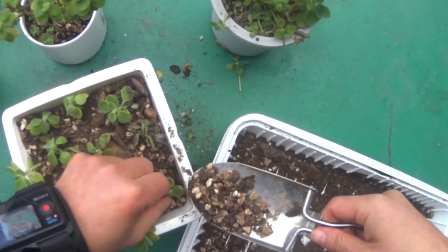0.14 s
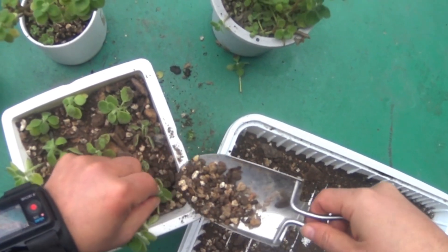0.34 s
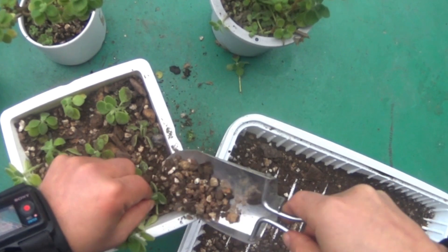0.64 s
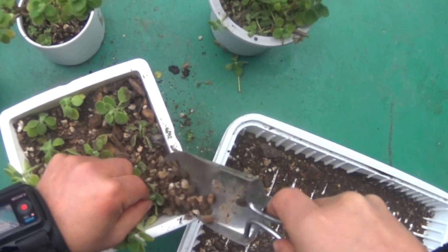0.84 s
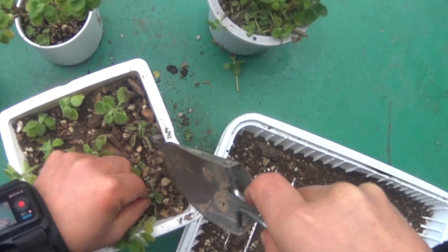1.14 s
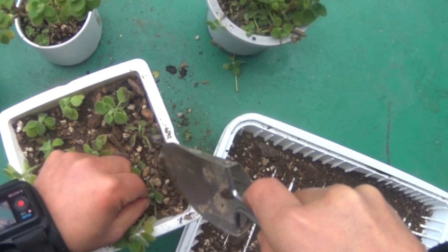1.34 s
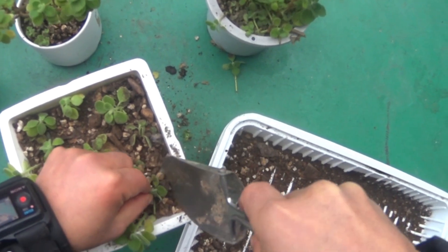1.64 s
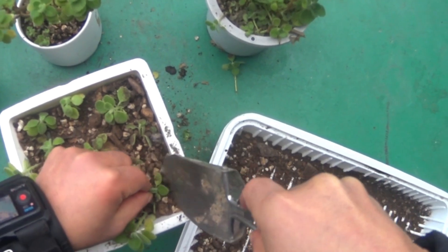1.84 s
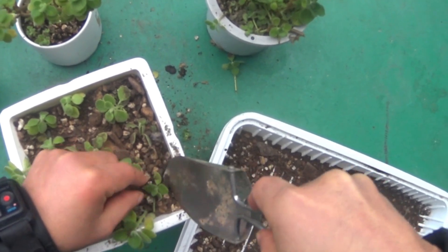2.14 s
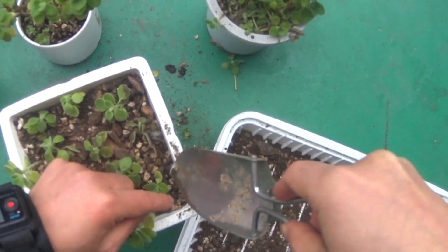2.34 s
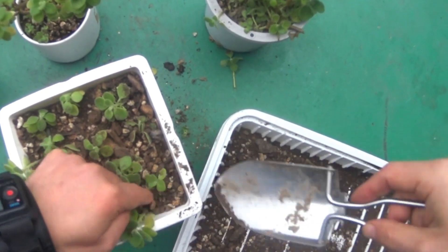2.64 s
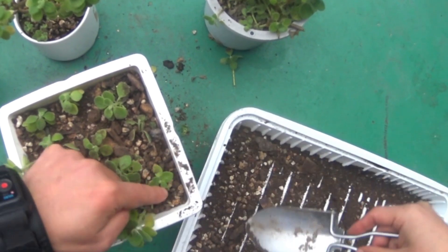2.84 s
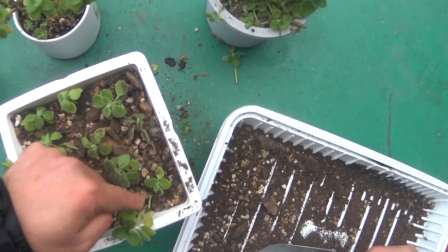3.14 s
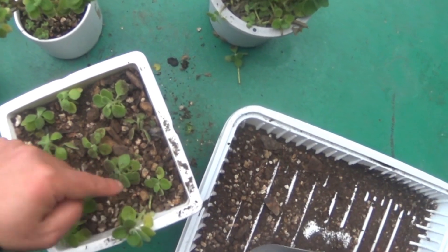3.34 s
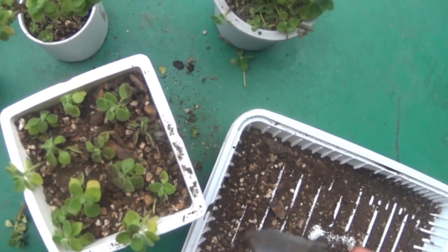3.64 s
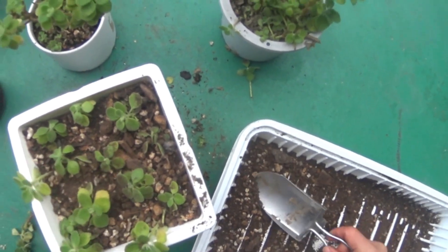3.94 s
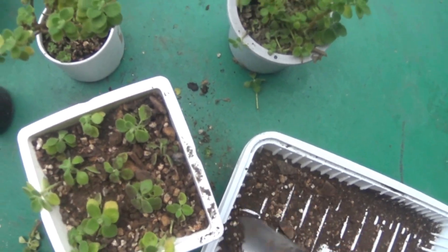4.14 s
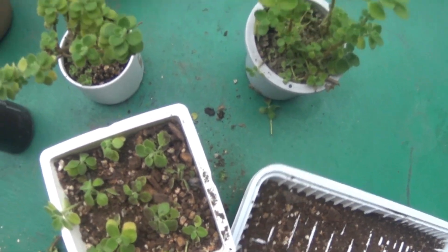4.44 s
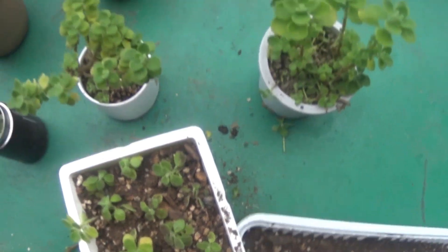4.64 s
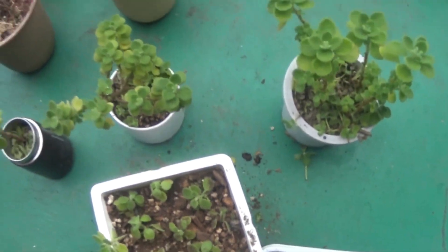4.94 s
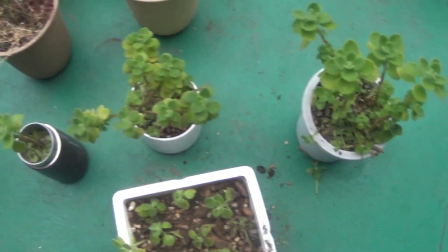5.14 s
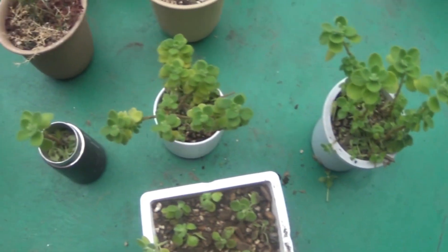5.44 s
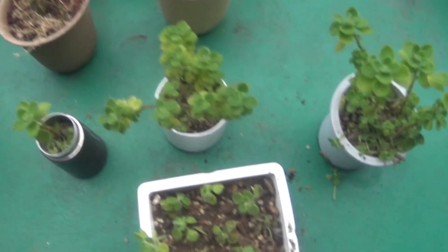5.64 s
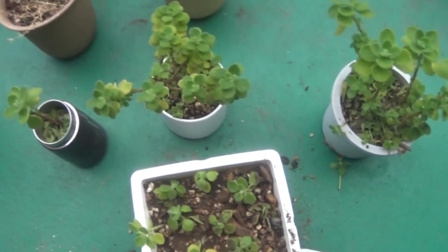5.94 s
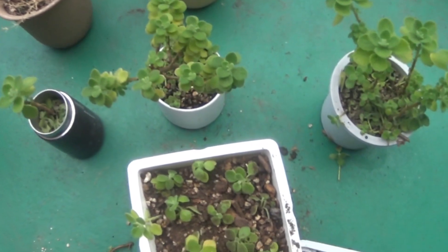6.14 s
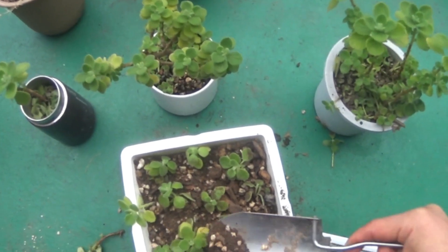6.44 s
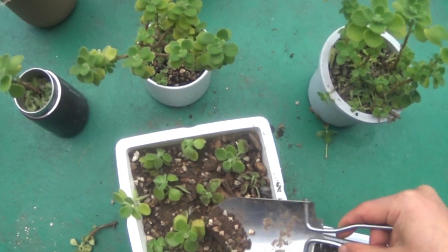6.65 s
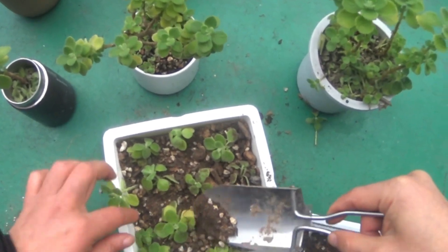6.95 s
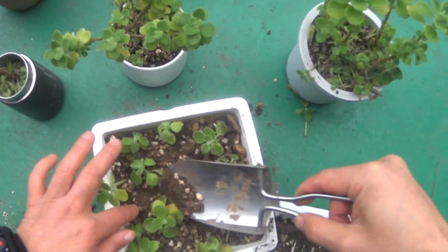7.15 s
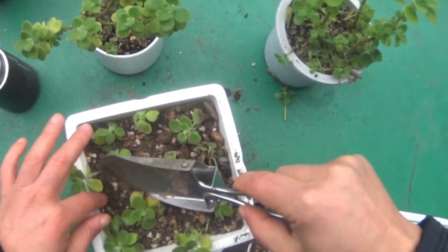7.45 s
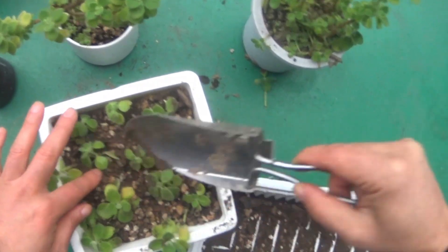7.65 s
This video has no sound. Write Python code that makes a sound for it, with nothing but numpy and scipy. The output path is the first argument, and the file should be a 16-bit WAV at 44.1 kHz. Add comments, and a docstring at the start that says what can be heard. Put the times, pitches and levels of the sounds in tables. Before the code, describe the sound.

A close stereo microphone pair hears soil trickling from a metal hand trowel, then quick rasping pats with ringing clinks. After a soft sleeve rustle, the trowel digs into grit in a thin plastic tray, with hard snapping stones, juddering edges and hollow rattle. Dull foot scuffs and brushing cloth follow, then isolated light metallic tings. The space is small and dry, with a faint steady background hiss.

```python
"""Over a faint steady background, gritty soil slides and ticks off a ringing steel trowel, then is patted down.
A sleeve rustles, the blade digs through a thin plastic tray, stones snap, feet scuff and last grains ting.
Soil, stones, soles and cloth are random collisions or noise bursts coloured by the spectrum of the body;
steel and plastic add tuned resonances. Short reflections and a wide stereo side signal place it up close."""
import sys
import numpy as np
from scipy import signal
from scipy.fft import rfft, irfft, next_fast_len
from scipy.io import wavfile
from scipy.ndimage import uniform_filter1d

SR = 44100
rng = np.random.default_rng(int(sys.argv[2]) if len(sys.argv) > 2 else 0)


def wav_record(signal):
    """Record a signal, one row per channel, as 16-bit PCM in the file named by sys.argv[1]."""
    frames = np.transpose(np.atleast_2d(signal))
    bounded = np.clip(frames, -1, 1)
    # unit amplitude maps onto the largest positive 16-bit level
    quanta = np.round(bounded * 32767).astype(np.int16)
    wavfile.write(sys.argv[1], SR, quanta)


N = 344421
T = np.arange(N) / SR
SIZE = next_fast_len(N + 8192, real=True)   # padded transform length
HZ = np.maximum(np.arange(SIZE // 2 + 1) * SR / SIZE, 1)

# Levels in the tables are before the trims and colouring in the functions.
# soil flow off the tilted blade, steepest just before it empties: time_s, level_db
POUR = [(0.45, -87), (0.61, -69), (0.8, -67), (0.91, -61), (0.99, -69.5), (1.35, -86)]
# short pushes of the blade into the soil: middle_s, level_db, half_length_s
PUSHES = [(1.533, -44, 0.015), (1.586, -52.5, 0.023), (1.701, -56, 0.017), (1.815, -60, 0.023),
          (1.905, -51.5, 0.034), (1.944, -60, 0.014), (2.02, -52, 0.02), (2.102, -63, 0.024),
          (2.163, -51.5, 0.021), (2.207, -58.5, 0.011)]
# grit and rim striking the blade: start_s, peak_db, ring_hz, fizz_db
BLADE_HITS = [(0.5755, -38, 2080, -54.5), (0.7142, -39, 5840, -57), (0.7665, -44, 4800, -60),
              (0.9269, -40, 4750, -59), (0.955, -39.5, 4830, -47), (1.0212, -38.5, 4880, -51.5),
              (1.0656, -35, 4920, -53), (1.0999, -41, 4650, -64), (1.1414, -45.5, 4200, -69),
              (1.3585, -48.5, 4080, -76), (1.51, -31.5, 4780, -47.5), (1.5426, -25.5, 5260, -37.5),
              (1.6317, -42, 5700, -55.5), (1.7622, -20, 5800, -46), (1.861, -39.5, 5400, -57),
              (1.9068, -33, 4250, -48), (6.4306, -53, 2630, -70), (6.4883, -41, 6220, -53.5)]
# strokes of the blade through the tray: start_s, length_s, grit_db, tray_body_db
DIG_STROKES = [(3.42, 0.072, -58.5, -57.5), (3.62, 0.24, -70.5, -69.5), (3.96, 0.09, -49.5, -49.5),
               (4.1, 0.35, -45.5, -48), (4.54, 0.19, -49.5, -48.5), (4.82, 0.17, -59.5, -55.5)]
# larger stones snapping against the tray: start_s, peak_db, ring_hz, knock_db
STONE_SNAPS = [(3.383, -26.5, 1290, -58), (3.441, -36.5, 2350, -44), (3.482, -23.5, 2610, -40),
               (3.4904, -27, 2530, -39), (3.513, -30, 3320, -65), (3.525, -24.5, 2880, -38),
               (3.531, -28, 3080, -38.5), (3.562, -28.5, 3050, -59), (3.576, -39.5, 1320, -45.5),
               (3.792, -41.5, 2240, -64), (3.9021, -29.5, 5070, -69), (3.911, -27, 4850, -48.5),
               (3.9243, -31.5, 6300, -53), (3.9542, -29, 2030, -67), (4.0664, -25.5, 1720, -81),
               (4.0876, -19.5, 2600, -57), (4.128, -23, 3470, -43), (4.154, -21, 5900, -41),
               (4.1888, -23, 5600, -82), (4.2116, -26.5, 2220, -44), (4.221, -26, 5940, -39),
               (4.2643, -15.5, 4700, -33.5), (4.3207, -18, 4600, -41), (4.357, -17, 5300, -42),
               (4.3662, -16, 5050, -55), (4.3846, -26.5, 5200, -40), (4.4038, -21.5, 6400, -33),
               (4.4114, -20.5, 2010, -37), (4.4363, -38, 4950, -37), (4.4972, -31, 2460, -42),
               (4.5309, -19, 1290, -27.5), (4.551, -27.5, 2500, -48), (4.607, -24, 2620, -40),
               (4.6535, -21, 2490, -28.5), (4.68, -23, 2360, -30), (4.691, -30, 1350, -26),
               (4.7129, -23.5, 2920, -36), (4.7195, -20, 4600, -32), (4.7396, -20, 4450, -36),
               (4.7504, -21.5, 2580, -34.5), (4.7716, -27.5, 1290, -46), (4.7932, -29, 3800, -64)]
# crumbs falling back as the loaded blade is lifted: start_s, peak_db
CRUMBS = [(4.7996, -40), (4.8304, -45.5), (4.853, -53), (4.872, -48)]
# blade edge juddering over the tray floor: middle_s, level_db, half_length_s
JUDDERS = [(3.53, -52, 0.033), (3.976, -32, 0.017), (4.015, -38.5, 0.017), (4.215, -32.5, 0.0049),
           (4.258, -39, 0.0065), (4.33, -38, 0.034), (4.397, -39, 0.018), (4.73, -38, 0.011)]
# slips of the tray on the floor: middle_s, level_db, half_length_s
TRAY_SLIPS = [(4.425, -64, 0.035), (4.654, -62, 0.0041), (4.715, -68, 0.063)]
# light clean tings of the free, nearly empty blade: start_s, level_db, lead_mode_hz
TINGS = [(3.636, -62.5, 4883), (6.523, -64, 4883), (6.879, -59, 3335), (7.112, -56.5, 4883),
         (7.412, -53, 4883)]
# scuffs on the floor: start_s, length_s, level_db
SCUFFS = [(5.06, 0.04, -54.5), (5.12, 0.049, -51), (5.3, 0.099, -51.5), (5.52, 0.3, -63.5),
          (7.73, 0.037, -69.5)]
# movements of the sleeve: start_s, length_s, swish_db, rub_db
SLEEVE_MOVES = [(2.22, 0.18, -70, -69.5), (2.7, 0.33, -62.5, -69.5), (4.98, 0.49, -59.5, -69.5),
                (5.65, 0.092, -62, -59.5), (5.9, 0.56, -67, -65.5), (6.76, 0.037, -62.5, -72),
                (7.12, 0.33, -69, -68), (7.78, 0.03, -64, -68.5)]
# modes of the steel blade: pitch_hz, relative_level_db, t60_s
BLADE_MODES = [(2376, -6, 0.19), (3335, 2.5, 0.18), (4883, 6.5, 0.058), (5350, -9, 0.076),
               (6000, -12, 0.014), (7320, -9, 0.019), (9100, -9, 0.027)]
# colour of soil on steel: frequency_hz, relative_level_db_per_hz
SOIL_ON_STEEL = [(650, -50), (1100, -37), (1290, -4.5), (1580, -5), (2340, 2.5), (2820, -7), (3240, -0.5),
                 (3900, -2.5), (4940, 1.5), (6130, 0.5), (6640, -3), (8570, -9), (9830, 1), (11200, -12),
                 (11500, -60), (15000, -65), (22000, -120)]
# colour of the thin plastic tray: frequency_hz, relative_level_db_per_hz
TRAY_COLOUR = [(88, -65), (150, -9), (263, -4.5), (973, -14), (1110, -15.5), (1300, -1.5), (1560, -12),
               (1710, -12.5), (2410, -3), (3470, -6), (5870, -4), (8450, -22.5), (9420, -12.5),
               (10900, -22.5), (11500, -28), (15000, -103), (22000, -120)]
# colour of a sole on the floor: frequency_hz, relative_level_db_per_hz
SOLE_COLOUR = [(88, -61), (150, -21), (203, -26), (409, -22), (516, -15.5), (609, -3.5), (1030, -4),
               (1240, 0.5), (1850, -8.5), (2160, -6), (2410, -8), (2650, -40), (4000, -19.5), (5200, -26),
               (8800, -120)]
# colour of rubbing cloth: frequency_hz, relative_level_db_per_hz
CLOTH_COLOUR = [(410, -39), (700, -6.5), (787, -7.5), (949, -20), (1270, 1.5), (1920, -3.5), (2630, 0),
                (3820, -7.5), (5830, -7.5), (7370, -19), (9530, -17), (11100, -23), (11500, -85),
                (15000, -68), (22000, -120)]
# colour of the background: frequency_hz, relative_level_db_per_hz
AIR_COLOUR = [(12, -29), (20, -4.5), (151, -7), (250, -8), (309, -9.5), (383, -9.5), (669, -11.5),
              (1200, -7.5), (1330, 1), (1650, -9.5), (2210, -7.5), (2740, -10), (4080, -14.5),
              (10600, -21.5), (11500, -32), (15000, -66), (22000, -120)]
# stereo widening by the microphone: frequency_hz, side_to_mid_db, side_lag_rad
WIDENING = [(60, -23, 2.1), (237, -2, 1.55), (536, 6.5, 1.73), (936, 5, 2.27), (1290, 3, 3.8),
            (1580, -12.5, 2.76), (2340, -73, 1), (4500, -31, 3), (9900, -12, 1.6)]
# weighting of the surrounding sound in the side channel: frequency_hz, gain_db
DIFFUSE = [(30, -22), (150, -14.5), (500, -16.5), (1300, -9), (2500, -10), (11000, -11.5)]

AIR_DB, CUTOFF_HZ = -69.5, 11250
# crumbs trickling round each push: level against the push, half length in s
TRICKLE_DB, TRICKLE_S = -31, 0.029
BLADE_KNOCK_DB = -18   # hollow knock against the blade hit's table peak, before trims
CRUNCH_RISE_S = 0.0006   # time constant as a grain gives way
# a dig takes hold quickly; its grit stops before the tray does (s per 20 dB)
DIG_ATTACK_S, GRIT_RELEASE_S, RATTLE_RELEASE_S = 0.069, 0.034, 0.23
# a snap crushes fine grit: fizz against table peak, and share of the grit level in dB it follows
FIZZ_DB, FIZZ_FOLLOWS = -19.5, 0.22
# crumbs share one pitch; knock and fizz are against the table peak, before trims
CRUMB_RING_HZ, CRUMB_KNOCK_DB, CRUMB_FIZZ_DB = 4370, -15, -2
SHOVE_FOLLOW_DB = -23   # floor rumble against the tray body level
SCUFF_ATTACK_S, SCUFF_RELEASE_S = 0.11, 0.13   # s per 20 dB
SLEEVE_ATTACK_S, SLEEVE_RELEASE_S = 0.25, 0.3   # s per 20 dB


def from_db(db):
    """Decibels to gain."""
    return 10 ** (np.asarray(db) / 20)


def rms_one(x):
    """Scale to unit power."""
    return x / np.sqrt(np.mean(x ** 2) + 1e-20)


def top_one(x, size):
    """Scale so that the loudest stretch of this many samples has unit power."""
    return x / np.sqrt(uniform_filter1d(x ** 2, size=size).max())


def gain_curve(points):
    """Smoothed gain in time from (s, dB) points, silent outside them."""
    s, db = np.transpose(points)
    level_db = np.interp(T, s, db, left=-200, right=-200)
    return uniform_filter1d(from_db(level_db), size=400)


def swells(rows):
    """Gain in time of short bell-shaped strokes."""
    return sum(from_db(level_db) * np.exp(-((T - s) / half_s) ** 2) for s, level_db, half_s in rows)


def strokes(rows, attack_s, release_s, axis=2):
    """Gain in time of movements: each swells, holds its level for its length and dies away."""
    power = 0
    for row in rows:
        start, length = row[:2]
        before = np.maximum(start - T, 0)
        after = np.maximum(T - start - length, 0)
        fade_db = 20 * (before / attack_s + after / release_s)
        power = power + from_db(row[axis] - np.minimum(fade_db, 100)) ** 2
    return np.sqrt(power)


def at_hz(points, axis=1):
    """A table column along log frequency."""
    points = np.array(points)
    return np.interp(np.log(HZ), np.log(points[:, 0]), points[:, axis])


def response(spectrum):
    """Causal (minimum-phase) impulse response of a body with this spectrum."""
    cepstrum = irfft(np.log(from_db(at_hz(spectrum))), SIZE)
    # folding the cepstrum forward in time makes the response causal
    cepstrum[1:SIZE // 2] *= 2
    cepstrum[SIZE // 2 + 1:] = 0
    return irfft(np.exp(rfft(cepstrum)), SIZE)[:4096]


def through(x, impulse):
    """Pass a sound through an impulse response."""
    return signal.fftconvolve(x, impulse)[:len(x)]


def cut(x, hz, kind, order=2):
    """High- or low-pass."""
    sos = signal.butter(order, min(hz, .45 * SR), kind, fs=SR, output="sos")
    return signal.sosfilt(sos, x)


def resonance(x, hz, width_hz):
    """One resonance, gain 1 at its top."""
    r = np.exp(-np.pi * width_hz / SR)
    zeros = np.array([1, 0, -1]) * (1 - r * r) / 2
    poles = [1, -2 * r * np.cos(2 * np.pi * hz / SR), r * r]
    return signal.lfilter(zeros, poles, x + 1e-18)


def drift(rate):
    """Slow random wander between unit-spread points, rate points a second."""
    points = rng.standard_normal(8000)
    return np.interp(T * rate, np.arange(len(points)), points)


def grains(per_s, spread_db, clump_db, clump_rate):
    """Tiny collisions of uneven size, bunched as the grit sticks and slips."""
    born, luck = rng.random((2, N))
    at = np.flatnonzero(born < per_s / SR)
    own_db = spread_db * np.minimum(-np.log(luck[at]), 4)
    bunch_db = clump_db * np.clip(drift(clump_rate)[at], -2, 2)
    sign = 1 - 2 * rng.integers(0, 2, N)[at]
    clicks = np.zeros(N)
    clicks[at] = from_db(own_db + bunch_db) * sign
    return clicks


def stones(clicks, cycles):
    """Each grain rings briefly at one of sixteen pitches, dealt at random; cycles is the resonance Q."""
    pitches = np.geomspace(1000, 11000, num=16)
    dealt = rng.integers(0, len(pitches), N)
    return rms_one(sum(resonance(clicks * (dealt == k), hz, hz / cycles) for k, hz in enumerate(pitches)))


def hits(rows, spectrum, rise_s, decay_s, crumble_db, crumble_s, ring_db, ring_width_hz,
         crack_db, knock_db, knock_hz, knock_width_hz, fizz_db):
    """Each hit crunches and trails crumbs: a ringing crack, a hollow knock and a fizz of fine grit."""
    out, body, t = np.zeros(N + 4096), response(spectrum), T[:4096]
    decay = from_db(-60 * t / decay_s)
    crumble = from_db(crumble_db - 60 * t / crumble_s)
    fade = (1 - np.exp(-t / rise_s)) * (decay + crumble)
    for s, peak_db, ring_hz, low_db, top_db in rows:
        crunch = rng.standard_normal(len(t)) * fade
        coloured = cut(through(crunch, body), 930, "high", order=4)
        snap_top_hz = np.clip(2 * ring_hz, 4200, 7200)
        snap = cut(cut(coloured, 2480, "high"), snap_top_hz, "low", order=3)
        ring = resonance(coloured, ring_hz, ring_width_hz)
        crack = top_one(snap, size=96) + from_db(ring_db) * top_one(ring, size=96)
        knock = resonance(cut(crunch, knock_hz, "high", order=5), knock_hz, knock_width_hz)
        fizz = cut(coloured, 7000, "high", order=4)
        start = round(s * SR)
        out[start:start + len(t)] += (from_db(peak_db + crack_db) * top_one(crack, size=96)
                                      + from_db(low_db + knock_db) * top_one(knock, size=400)
                                      + from_db(top_db + fizz_db) * top_one(fizz, size=400))
    return out[:N]


def air():
    """Steady faint background of coloured noise."""
    return from_db(AIR_DB) * rms_one(through(rng.standard_normal(N), response(AIR_COLOUR)))


def soil_slide():
    """Coarse soil pours and trickles off the blade; fine soil rasps along it in pushes."""
    body = response(SOIL_ON_STEEL)
    coarse = stones(grains(per_s=3600, spread_db=4.5, clump_db=2, clump_rate=290), cycles=3.8)
    fine = grains(per_s=11000, spread_db=2.5, clump_db=4.0, clump_rate=1000)
    trickle = swells([(s, db + TRICKLE_DB, TRICKLE_S) for s, db, _ in PUSHES])
    flow = gain_curve(POUR) + trickle
    pour = flow * from_db(1.5) * rms_one(through(coarse, body))
    rasp = swells(PUSHES) * from_db(-3.0) * rms_one(through(fine, body))
    return pour + rasp


def blade_ticks():
    """Grit and rim strike the steel with short, bright crunches."""
    contacts = [(s, db, hz, db + BLADE_KNOCK_DB, fizz_db) for s, db, hz, fizz_db in BLADE_HITS]
    return hits(contacts, SOIL_ON_STEEL, rise_s=CRUNCH_RISE_S, decay_s=0.025,
                crumble_db=-24, crumble_s=0.043, ring_db=3.5, ring_width_hz=240, crack_db=-12.5,
                knock_db=-11.0, knock_hz=1320, knock_width_hz=150, fizz_db=-0.5)


def blade_ring(contact, wander_db=8.0):
    """The steel modes answer a contact, each more or less as the point of contact wanders."""
    out = 0
    for hz, db, t60 in BLADE_MODES:
        wander = from_db(wander_db * np.clip(drift(44.77), -2, 1))
        width_hz = np.log(1000) / (np.pi * t60)
        out = out + from_db(db) * resonance(contact * wander, hz, width_hz)
    return out


def trowel():
    """Sliding soil and ticks are heard directly and set the modes of the blade ringing."""
    sliding, ticks = soil_slide(), blade_ticks()
    ringing = from_db(10.5) * blade_ring(sliding) + from_db(0.5) * blade_ring(ticks)
    return sliding + ticks + ringing


def sleeve():
    """Fine fibres rub: a soft swish above a duller rub."""
    clicks = grains(per_s=16000, spread_db=1.5, clump_db=1.5, clump_rate=65)
    fibres = through(clicks, response(CLOTH_COLOUR))
    swish_gain = from_db(-6) * strokes(SLEEVE_MOVES, SLEEVE_ATTACK_S, SLEEVE_RELEASE_S)
    rub_gain = from_db(-3.0) * strokes(SLEEVE_MOVES, SLEEVE_ATTACK_S, SLEEVE_RELEASE_S, axis=3)
    swish = swish_gain * rms_one(cut(fibres, 4800, "high", order=3))
    rub = rub_gain * rms_one(cut(fibres, 2780, "low", order=4))
    return swish + rub


def tray_contacts(depth):
    """Stones fizz more the deeper the blade is in the grit; crumbs carry a strong fizz."""
    depth_db = 20 * np.log10([depth[round(row[0] * SR)] for row in STONE_SNAPS])
    gritty_db = FIZZ_DB + FIZZ_FOLLOWS * (depth_db - depth_db.mean())
    snaps = [(s, db, hz, knock_db, db + extra_db)
             for (s, db, hz, knock_db), extra_db in zip(STONE_SNAPS, gritty_db)]
    crumbs = [(s, db, CRUMB_RING_HZ, db + CRUMB_KNOCK_DB, db + CRUMB_FIZZ_DB) for s, db in CRUMBS]
    return snaps + crumbs


def tray_snaps(depth):
    """Stones and falling crumbs crunch against the plastic."""
    return hits(tray_contacts(depth), TRAY_COLOUR, rise_s=CRUNCH_RISE_S, decay_s=0.013,
                crumble_db=-17, crumble_s=0.098, ring_db=1.5, ring_width_hz=250, crack_db=-8.5,
                knock_db=-7.5, knock_hz=1290, knock_width_hz=69, fizz_db=0.5)


def tray_grit(depth, body):
    """Digging drives the same grit as a bright hiss and a lower plastic rattle that dies more slowly."""
    clicks = grains(per_s=4500, spread_db=4.5, clump_db=2.0, clump_rate=280)
    grit = through(stones(clicks, cycles=13.0) + from_db(5.5) * rms_one(clicks), body)
    hiss = depth * rms_one(cut(grit, 3500, "high", order=3))
    rattle_gain = strokes(DIG_STROKES, DIG_ATTACK_S, RATTLE_RELEASE_S, axis=3)
    rattle = rattle_gain * rms_one(cut(cut(grit, 847, "high", order=4), 2940, "low", order=3))
    return hiss + rattle


def tray_judder(body):
    """The edge sticks and slips on the tray floor in dense bunched clicks."""
    slips = through(grains(per_s=8500, spread_db=-0.1, clump_db=4.0, clump_rate=930), body)
    return swells(JUDDERS) * rms_one(cut(cut(slips, 1620, "high"), 6940, "low", order=10))


def tray():
    """Grit, judder and snapping stones excite three resonances of the thin plastic panel."""
    body = response(TRAY_COLOUR)
    depth = strokes(DIG_STROKES, DIG_ATTACK_S, GRIT_RELEASE_S)
    contact = tray_grit(depth, body) + tray_judder(body) + tray_snaps(depth)
    panel = (from_db(6) * resonance(contact, 1734, 101)
             + from_db(3.5) * resonance(contact, 2110, 54)
             + from_db(-4.5) * resonance(contact, 2295, 61))
    return from_db(-4.0) * contact + panel


def shove():
    """The whole tray grumbles on the floor under each stroke, with extra swells when it slips."""
    rub = grains(per_s=2700, spread_db=1.5, clump_db=2.0, clump_rate=66)
    follow = strokes(DIG_STROKES, DIG_ATTACK_S, RATTLE_RELEASE_S, axis=3)
    force = from_db(SHOVE_FOLLOW_DB) * follow + swells(TRAY_SLIPS)
    return force * rms_one(cut(cut(rub, 145, "high"), 1550, "low", order=3))


def tings():
    """A grain just grazes the blade: a tiny scratch and a clear ring, led by one mode."""
    out, body = np.zeros(N), response(SOIL_ON_STEEL)
    t = T[:len(body)]
    modes = top_one(sum(from_db(db - 60 * t / t60) * np.sin(2 * np.pi * hz * t)
                        for hz, db, t60 in BLADE_MODES), size=96)
    for s, level_db, lead_hz in TINGS:
        scratch = through(rng.standard_normal(len(t)) * from_db(-60 * t / 0.026), body)
        lead = np.sin(2 * np.pi * lead_hz * t) * from_db(-60 * t / 0.071)
        ring = from_db(-4) * modes * from_db(-60 * t / 0.4) + from_db(-2) * lead
        onset = 1 - np.exp(-t / 0.00044)
        ting = (ring + from_db(2.5) * top_one(scratch, size=96)) * onset
        start = round(s * SR)
        out[start:start + len(ting)] += from_db(level_db) * ting
    return out


def scuffs():
    """A dull gritty rub on the floor, with a faint rumble as weight shifts."""
    clicks = grains(per_s=3500, spread_db=3.5, clump_db=1.8, clump_rate=77)
    rub = rms_one(through(clicks, response(SOLE_COLOUR)))
    rumble = rms_one(cut(rng.standard_normal(N), 240, "low"))
    force = strokes(SCUFFS, SCUFF_ATTACK_S, SCUFF_RELEASE_S)
    return force * from_db(3.5) * rub + np.sqrt(force) * from_db(-48.0) * rumble


def reflections(x, t60):
    """A dense scatter of echoes from nearby surfaces, unit energy."""
    t = T[:SR // 2]
    tail = rng.standard_normal(len(t)) * from_db(-60 * t / t60) * (t > .001)
    return through(x, tail / np.sqrt(np.sum(tail ** 2)))


def scene():
    """All sources lie ahead; the close-set microphone pair widens the low mids into opposite phase."""
    direct = trowel() + sleeve() + tray() + shove() + tings() + scuffs()
    mid = direct + from_db(-13.5) * reflections(direct, t60=0.14) + air()
    around = reflections(direct, t60=0.048) + from_db(8.5) * air()
    widening = from_db(at_hz(WIDENING)) * np.exp(-1j * at_hz(WIDENING, axis=2))
    side_spectrum = rfft(mid, SIZE) * widening + rfft(around, SIZE) * from_db(at_hz(DIFFUSE))
    side = irfft(side_spectrum, SIZE)[:N]
    return np.array([mid + side, mid - side])


def record(dry):
    """The top is cut steeply by an elliptic low-pass."""
    return signal.sosfilt(signal.ellip(10, .3, 70, CUTOFF_HZ, fs=SR, output="sos"), dry)


dry = scene()
out = record(dry)
wav_record(out)
```